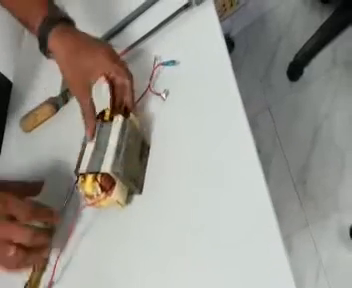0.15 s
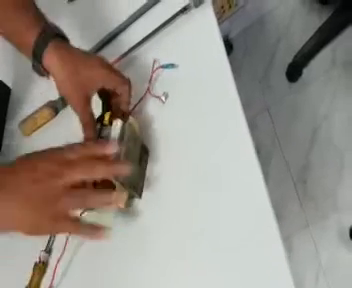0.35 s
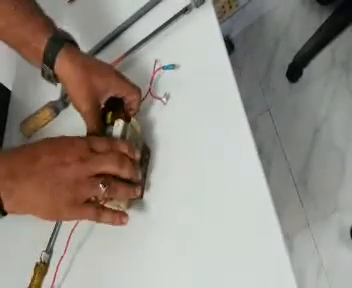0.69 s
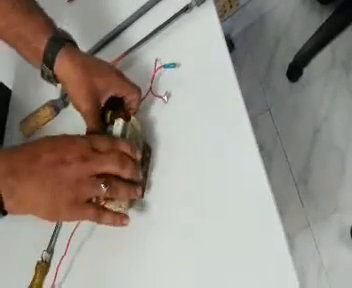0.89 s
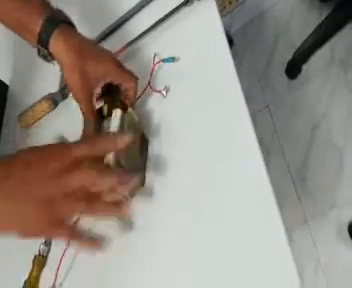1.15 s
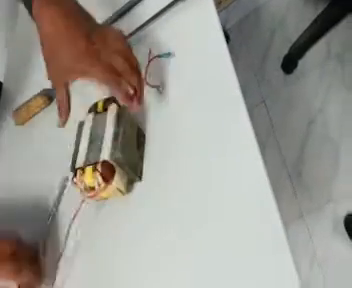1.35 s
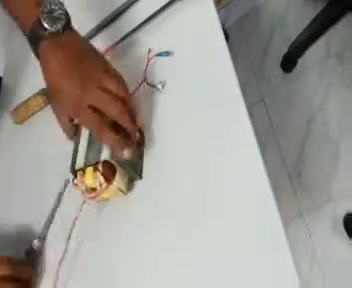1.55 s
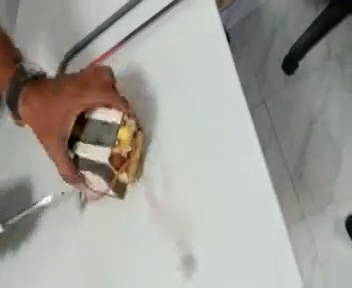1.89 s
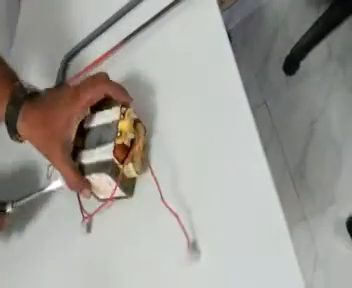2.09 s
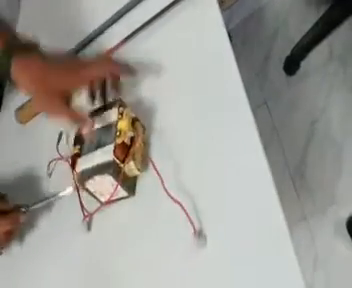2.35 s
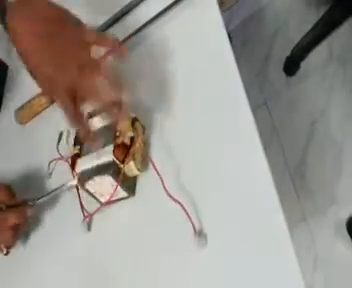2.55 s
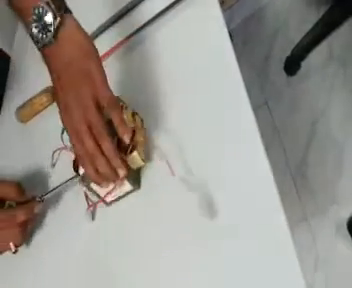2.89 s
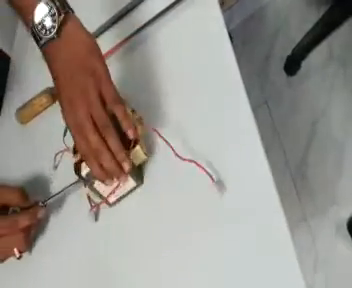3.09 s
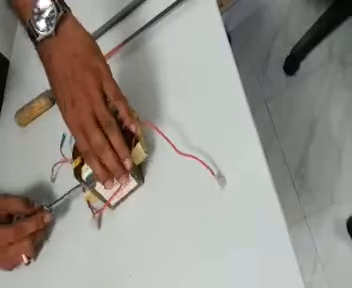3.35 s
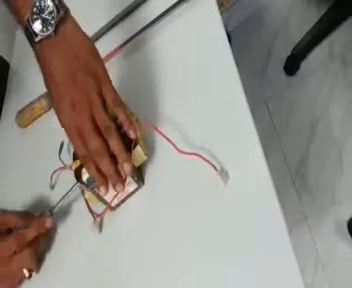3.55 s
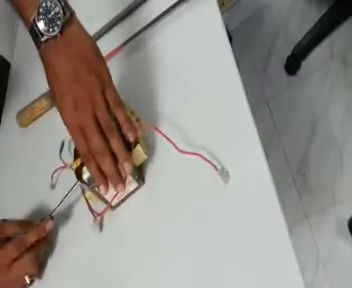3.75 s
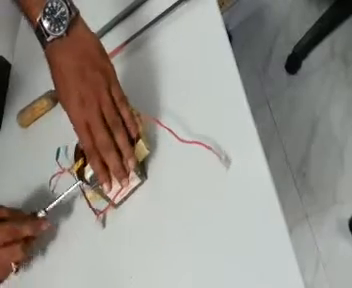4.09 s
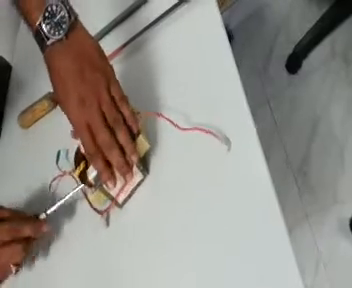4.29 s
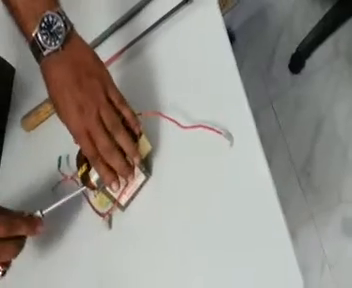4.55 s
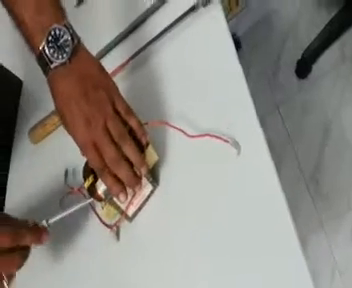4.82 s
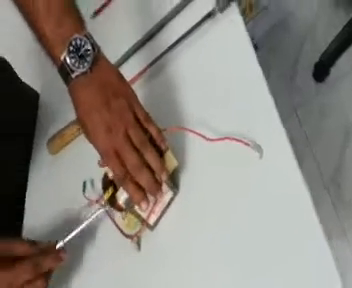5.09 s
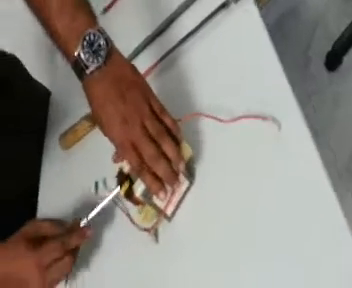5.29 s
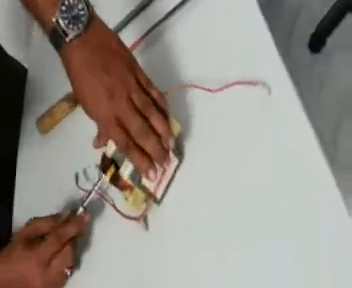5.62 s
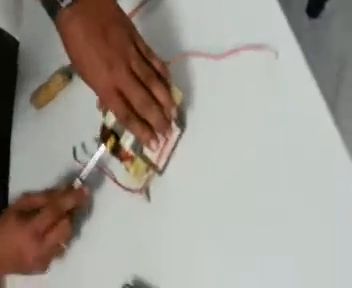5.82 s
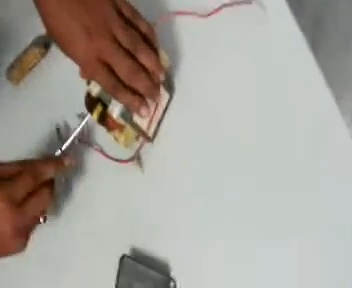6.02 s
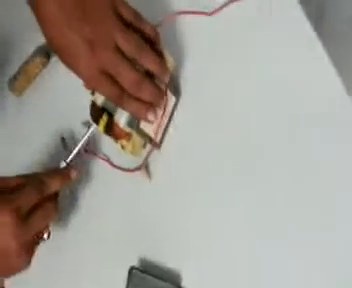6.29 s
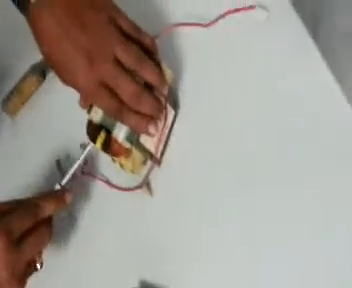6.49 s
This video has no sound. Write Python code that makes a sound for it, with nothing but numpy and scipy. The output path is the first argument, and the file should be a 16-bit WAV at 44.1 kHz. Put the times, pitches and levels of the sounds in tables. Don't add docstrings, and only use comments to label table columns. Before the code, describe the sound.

A small iron core with a winding is dragged and knocked down on a resonant table in a hard room, with steel clicks and short scrapes, mostly in the first two seconds. A quieter stretch of faint prying ticks follows, then loud crackling finger rubs on the left microphone port near five seconds, and hard metallic snaps at the end. Close, muffled above, clipping at peaks.

```python
import sys
import numpy as np
from scipy import signal
from scipy.fft import rfft, irfft, next_fast_len
from scipy.io import wavfile
from scipy.ndimage import uniform_filter1d, map_coordinates

SR = 44100
rng = np.random.default_rng(int(sys.argv[2]) if len(sys.argv) > 2 else 0)


def waveform_to_disk(signal):
    frames = np.transpose(np.atleast_2d(signal))
    scaled = np.clip(frames, -1, 1) * 32767
    samples = np.round(scaled).astype(np.int16)
    wavfile.write(sys.argv[1], SR, samples)


def nominal_scale(level):
    x = np.asarray(level, float) / 20
    return 10 ** x


N = 293265

JOLT_DB_PER_S = 6000

# start_s, end_s, level_db, brightness_db, heaviness_db
SLIDES = [(0, 0.051, -22.5, -9, -26), (0.283, .33, -25.5, -8.5, -7.5), (1.029, 1.079, -37.5, -2, -10),
          (1.264, 1.362, -51, -17, 2), (1.424, 1.484, -28.5, 1.5, -9.5), (1.477, 1.54, -24, -8, -15),
          (1.547, 1.588, -20.5, -2.5, -29), (1.616, 1.728, -31.5, -2.5, -8), (1.791, 1.964, -41, 1.5, -8.5),
          (2.694, 2.81, -45.5, 10, -4.5), (3.187, 3.245, -51.5, 10, -1), (3.278, 3.343, -43.5, 1.5, -11.5),
          (3.86, 3.888, -48, 7, -14), (4.055, 4.15, -46, 6.3, 0.1), (4.996, 5.047, -38.5, 6, -26),
          (5.32, 5.331, -32.5, 0.5, -3.5), (5.483, 5.477, -43, -5, -3.5), (5.555, 5.653, -39, -7.5, -5.5),
          (5.685, 5.789, -38.5, 3.5, -8), (5.91, 6.092, -49.5, 1.8, -15), (6.258, 6.307, -63, -5, -31),
          (6.393, 6.381, -34, -3, -19), (6.496, 6.485, -34.5, 3, -27), (6.55, 6.652, -51, 8, -26)]
# centre_hz, width_hz, level_db
BOARD = [(343, 26, -6), (399, 18, -4.5), (496, 22, -7.5), (565, 25, 0.5), (704, 70, -6.5), (797, 13, 2),
         (929, 40, -5), (1064, 13, -1.5), (1250, 45, -6), (1650, 50, -6)]
PUSH_DB_PER_S, STOP_DB_PER_S = 165.5, 218.5
LINGER_DB, LINGER_DB_PER_S = -8, 56
KNOCK_BRIGHT_DB = -12


def drag():
    shudders = [(s, s + length_s, db, KNOCK_BRIGHT_DB, heavy_db)
                for s, _, db, length_s, heavy_db in KNOCKS]
    start, end, db, bright_db, heavy_db = np.transpose(SLIDES + shudders)
    swell = np.repeat([PUSH_DB_PER_S, JOLT_DB_PER_S], [len(SLIDES), len(KNOCKS)])
    direct_db = held(start, end, db, swell, STOP_DB_PER_S)
    linger_db = held(start, end, db + LINGER_DB, swell, LINGER_DB_PER_S)
    level_db = np.maximum(direct_db, linger_db) + 0.34
    gain = summed(level_db, nominal_scale([0 * db, bright_db - 1.5, heavy_db - 0.5]))

    board = modes(BOARD)
    hump = lambda hz, centre_hz, steep_db: nominal_scale(-steep_db * np.log2(hz / centre_hz + 1e-3) ** 2)
    body = paired(grains(2.1, rate=60), lambda hz: hump(hz, 681, 9.7) * (0.41 + abs(board(hz))))
    upper = paired(grains(1.7, rate=90), lambda hz: hump(hz, 1334, 6.9))
    lower = paired(grains(1.7, rate=32), lambda hz: hump(hz, 333, 15))
    return gain[0] * body + gain[1] * upper + gain[2] * lower


# start_s, peak_db, shudder_db, shudder_s, heaviness_db
KNOCKS = [(0.091, -23, -21.5, 0.032, -18.5), (0.338, -2.5, -11, .014, -11.5),
          (0.69, -16.5, -34, 0.073, -18), (0.789, -18, -20.5, 0.07, -12.5), (1.989, -24, -28, .02, -9.5),
          (2.003, -21, -31.5, 0.094, -1), (2.138, -9, -18.5, 0.014, -7.5), (2.149, -4.5, -19.5, 0.024, -2),
          (3.889, -23, -34.5, 0.043, 1.5), (4.15, -30, -28, 0.033, 0), (4.7, -28.5, -49, 0.055, 3.5),
          (5.501, -19, -32.5, 0.022, 0.5)]
KNOCK_T60_S = 0.17


def knocks():
    out, t = np.zeros((2, N + SR)), np.arange(SR // 4) / SR
    board, floor = modes(BOARD), modes([(600, 800, 0)])

    def table_top(hz):
        lowpass = (1 + 1j * hz / 1500) ** 2
        highpass = (1 - 1j * 220 / (hz + 1)) ** 2
        return (board(hz) + 0.22 * floor(hz)) / lowpass / highpass

    for s, db, *_ in KNOCKS:
        shake = nominal_scale(-60 * t / KNOCK_T60_S) * rng.standard_normal((2, len(t)))
        shake[0, :30] += 7 * np.hanning(30) * np.linspace(1, -1, 30)
        mid, side = filtered(shake, table_top)
        ring = np.array([mid + 0.65 * side, mid - 0.34 * side])
        out[:, round(s * SR):][:, :len(t)] += nominal_scale(db - 2.5) * ring / abs(mid).max()
    return out[:, :N]


# start_s, peak_db, centre_hz, left_minus_right_db
CORE = [(.0927, -14, 2190, 2), (.3306, -14, 2000, 14.5), (.3425, -8, 1287, 2), (.7831, -19, 1510, 5),
        (.9807, -27.5, 3440, 16), (1.2625, -33, 1490, 1), (1.3714, -9.5, 2130, 9), (1.5614, -13, 1980, 5),
        (2.138, -15.5, 3480, -5), (3.8551, -34, 1600, -4)]
# start_s, peak_db, centre_hz, left_minus_right_db
TICKS = [(.3681, -8, 3180, 4.3), (1.3668, -3.5, 3220, 11.5), (2.6758, -33, 1950, 5),
         (2.7043, -27.5, 1650, -0.5), (2.9677, -22.5, 3060, 0.5), (3.2799, -13.5, 3750, 10.5),
         (3.2844, -17, 4130, 13.5), (3.2909, -8.5, 3900, 6), (3.2964, -11.5, 2400, -0.5),
         (4.2527, -23, 4070, 7.5), (4.2737, -15, 3840, 16.5), (4.4263, -29.5, 3550, 8),
         (4.577, -28, 4500, 6.5), (4.6144, -26, 3030, 25), (4.6478, -31, 2860, 3.5),
         (4.7755, -27, 3600, 11), (6.0332, -15.5, 3980, 13.5), (6.4862, -8.5, 3850, 4.2)]
# start_s, peak_db, centre_hz, left_minus_right_db
SNAPS = [(.6835, -16, 3350, 4), (1.5529, -9.5, 3250, 3), (6.3545, -2, 4300, 11), (6.3595, -10, 2000, 3),
         (5.049, -13, 3200, 17.5), (5.2426, -24, 2500, -2), (5.295, -15.5, 3430, -1), (5.3085, -3, 2980, 0),
         (5.3689, -20.5, 2940, 5.5), (5.4825, -17.5, 1555, 2), (5.502, -21, 2250, -10.5),
         (5.5209, -22.5, 2300, -12), (5.6858, -29, 2490, -9), (5.697, -21.5, 2530, 4)]
# start_s, peak_db, centre_hz, left_minus_right_db
SPRINGS = [(6.153, -2, 3394, 9)]
# kind, body_db, breadth_db, shaft_ring_db
CONTACTS = [(CORE, 2.3, -17, -29), (TICKS, -21.5, -8, -38), (SNAPS, -7.5, -2.5, -30),
            (SPRINGS, -34, -3, -11.5)]
# centre_hz, width_hz, level_db
SHAFT = [(1693, 45, -0.5), (2240, 89, 0), (3900, 58, -3)]


def clicks():
    out, t = np.zeros((2, N + SR)), np.arange(2048) / SR
    contacts = [(*row, *colour) for kind, *colour in CONTACTS for row in kind]
    for s, db, hz, pan_db, body_db, broad_db, ring_db in contacts:
        envelope = nominal_scale(-60 * t / 0.0082) * (1 - np.exp(-t / 0.00046))
        crack = envelope * rng.standard_normal((2, len(t)))
        crack[1] = 0.41 * crack[0] + 1.2 * crack[1]
        bands = [(hz, 450, 0), (4700, 1500, broad_db - 3.0), (1800, 600, broad_db - 8.5)]
        steel = filtered(crack, modes(bands))
        steel = steel / abs(steel).max(1, keepdims=True) * nominal_scale(-3.5) * sides(pan_db)[:, None]
        body = filtered(crack[0], modes([(1075, 300, 0)]))
        ring = filtered(crack, modes(SHAFT))
        hit = nominal_scale(db + 1.23) * (steel + nominal_scale(body_db) * body / abs(body).max())
        hit = hit + nominal_scale(db + ring_db) * ring / abs(ring).max()
        tail = nominal_scale(-7) * room(hit)
        out[:, round(s * SR):][:, :len(t)] += hit
        out[:, round(s * SR):][:, :tail.shape[1]] += tail
    return out[:, :N]


# freq_hz, t60_s
ROOM = [(200, 0.65), (700, 0.31), (2000, 0.24), (5000, 0.24)]


def room(x):
    hz, t, z = signal.stft(rng.standard_normal((2, SR // 4)), SR, nperseg=256)
    decay = nominal_scale(-60 * t / along(ROOM, hz)[:, None])
    tail = signal.istft(z * decay, SR, nperseg=256)[1]
    return signal.fftconvolve(x, tail / np.linalg.norm(tail[0]), axes=1)


# start_s, end_s, level_db, left_minus_right_db
GRINDS = [(0, 0.005, -46, 7), (0.162, 0.264, -49, 6), (0.331, 0.327, -34.5, 8), (0.988, 0.994, -42, 13.5),
          (1.036, 1.067, -39.5, 19), (1.298, 1.365, -49, 3), (1.503, 1.545, -32, 16.5),
          (1.603, 1.7, -36.5, 17.5), (1.734, 1.83, -35, 9.5), (2.657, 2.716, -42.5, 6),
          (2.74, 2.812, -45.5, 12), (3.176, 3.263, -57.5, 3.5), (3.846, 3.904, -50, 6),
          (4.133, 4.255, -53, 7), (4.265, 4.32, -46.5, 11), (4.43, 4.455, -49, 0), (4.593, 4.651, -48.5, 7),
          (4.78, 4.766, -41, 9), (5.9, 5.911, -42.5, 16), (5.993, 6.007, -35, 15), (6.2, 6.218, -46, 4),
          (6.309, 6.33, -51.5, 8), (6.406, 6.474, -45.5, 6), (6.526, 6.651, -45, 5.5)]
# start_s, level_db, left_minus_right_db
SKIDS = [(0.094, -30, 7.5), (0.373, -37, -8), (0.684, -32.5, 2.5), (1.38, -36.5, 1), (1.558, -20, 8),
         (2.141, -40, 9), (2.97, -45.5, 3), (3.299, -29.5, 4), (4.279, -49.5, 3), (6.144, -32.5, 7.5),
         (6.162, -38, 16), (6.368, -38, 2.5), (6.487, -32, 14)]
# freq_hz, level_db_per_hz
GRIT = [(530, -20.5), (900, -4.5), (1050, -4), (1180, -7.5), (1690, -6), (2140, -4), (3590, -3),
        (4860, -12), (5270, -29), (6850, -56.5), (11600, -120)]
GRIND_SWELL_DB_PER_S, GRIND_FADE_DB_PER_S, SKID_FADE_DB_PER_S = 210, 227, 322


def scrape():
    start, end, db, pan_db = np.transpose(GRINDS)
    grind_db = held(start, end, db, GRIND_SWELL_DB_PER_S, GRIND_FADE_DB_PER_S)
    grinds = summed(grind_db, sides(pan_db))
    s, db, pan_db = np.transpose(SKIDS)
    skids = summed(held(s, s, db, JOLT_DB_PER_S, SKID_FADE_DB_PER_S), sides(pan_db))
    grit = paired(grains(2.3, rate=160), lambda hz: tone(GRIT, 3800, 9)(hz) * (hz > 1700))
    return np.hypot(grinds, skids) * grit


# start_s, end_s, level_db
STROKES = [(5.099, 5.097, -24.5), (5.135, 5.165, -26.5), (5.216, 5.258, -27), (5.287, 5.286, -18),
           (5.315, 5.337, -2.5), (5.358, 5.379, -9.5), (5.377, 5.406, -8), (5.423, 5.439, -24.5),
           (5.586, 5.596, -34.5), (5.706, 5.732, -7), (5.727, 5.752, -5.5), (5.769, 5.768, -9),
           (5.823, 5.851, -42.5)]
# start_s, end_s, level_db
FLICKS = [
    (4.915, 4.939, -29),
    (4.954, 4.967, -21.5),
    (4.983, 5.001, -12),
    (5.023, 5.044, -10.5),
    (5.799, 5.798, -13),
]
# start_s, end_s, level_db
ASIDE = [(4.943, 4.96, -48), (5.011, 5.08, -37.5), (5.145, 5.161, -42), (5.27, 5.342, -38.5),
         (5.398, 5.46, -42.5), (5.522, 5.524, -26), (5.544, 5.585, -31), (5.7, 5.748, -32.5),
         (5.803, 5.837, -49.5)]
# freq_hz, level_db_per_hz
SKIN = [(350, -60), (600, -25.5), (1040, -28.5), (1260, -11), (1440, -7.5), (1600, -7), (1970, -5.5),
        (2970, 0.5), (3560, 0), (5270, -9), (6850, -38.5), (11600, -120)]
LAND_DB_PER_S, LIFT_DB_PER_S, CATCH_DB_PER_S = 625.5, 750.5, 2504
FIRMER = 8.6
CRACKLE_PER_S, CRACKLE_DB = 1300, 3


def rub():
    start, end, db = np.transpose(STROKES + FLICKS)
    is_stroke = np.arange(len(db)) < len(STROKES)
    land = np.where(is_stroke, LAND_DB_PER_S + FIRMER * db, CATCH_DB_PER_S)
    lift = LIFT_DB_PER_S + FIRMER * db
    pressure = summed(held(start, end, db, land, lift), [np.ones(len(db))])[0]

    chance, size = rng.random(N), rng.exponential(size=N)
    pops = (chance < CRACKLE_PER_S / SR) * nominal_scale(CRACKLE_DB * size)
    crackle = unit(pops * np.sign(size - np.log(2)))
    hiss = nominal_scale(1.5 * wobble(90)) * grains(1.2, rate=300)[0]
    left = pressure * unit(filtered(hiss + nominal_scale(-6.5) * crackle, tone(SKIN, 3400, 6)))

    grit = tone(GRIT, 3800, 14)
    tilt = lambda hz: nominal_scale(-2.5 * np.log2(hz / 2000 + .1)) * (hz > 900)
    far = unit(filtered(grains(3.7, rate=120), lambda hz: grit(hz) * tilt(hz)))
    aside_db = held(*np.transpose(ASIDE), GRIND_SWELL_DB_PER_S, GRIND_FADE_DB_PER_S)
    aside = summed(aside_db, [np.ones(len(ASIDE))])
    return np.array([left, np.zeros(N)]) + aside * far * nominal_scale([[-9], [.1]])


# freq_hz, level_db_per_hz
AIR = [(35, -49), (60, -23.5), (259, -11), (295, -7), (376, -4.5), (453, -8), (547, -5), (1680, -10),
       (2230, -18), (4290, -8), (5270, -53), (6850, -61.5), (11600, -120)]
AIR_DB = -48.5


def room_air():
    level = nominal_scale(AIR_DB + 1.82 + 0.4 * wobble(3))
    return level * paired(rng.standard_normal((2, N)), tone(AIR, 3986, 19))


def unit(x):
    return x / np.sqrt(np.mean(x ** 2) + 1e-20)


def along(points, hz):
    f, v = np.transpose(points)
    return np.interp(np.log(hz + 1), np.log(f + 1), v)


def wobble(rate):
    knots = rng.standard_normal(int(N * rate / SR) + 4)
    return map_coordinates(knots, [np.arange(N) * rate / SR])


def filtered(x, response):
    m = next_fast_len(x.shape[-1] + 8192)
    return irfft(rfft(x, m) * response(np.fft.rfftfreq(m, 1 / SR)), m)[..., :x.shape[-1]]


def modes(table):
    def response(f):
        total = 0
        for k, (centre, width, db) in enumerate(table):
            damping = 1j * f * width
            total = total + (-1) ** k * nominal_scale(db) * damping / (centre * centre - f * f + damping)
        return total
    return response


def tone(points, knee_hz, slope_db):
    def gain(hz):
        rolloff_db = slope_db * np.maximum(hz - knee_hz, 0) / 1000
        return nominal_scale(along(points, np.minimum(hz, knee_hz)) - rolloff_db)
    return gain


def grains(spread_db, rate):
    return nominal_scale(spread_db * wobble(rate)) * rng.standard_normal((2, N))


# freq_hz, likeness_0_to_1
ALIKE = [(60, 0.82), (140, 0.96), (350, 0.84), (830, 0.43), (2000, 0.07), (4820, 0.076)]


def paired(pair, gain):
    turn = lambda hz: np.arccos(np.clip(along(ALIKE, hz), 0, 1)) / 2
    mid, side = filtered(pair, lambda hz: gain(hz) * [np.cos(turn(hz)), np.sin(turn(hz))])
    return unit(np.array([mid + side, mid - side]))


def sides(pan_db):
    right = nominal_scale(-pan_db)
    return 2 * np.array([np.ones_like(right), right]) / np.sqrt(1 + right ** 2)


def held(start, end, db, swell, fade):
    t = np.arange(0, N / SR + .01, .001)[:, None]
    return db - np.maximum(np.maximum(swell * (start - t), fade * (t - end)), 0)


def summed(level_db, gains):
    total = np.sqrt(nominal_scale(2 * level_db) @ np.transpose(gains) ** 2)
    t = np.arange(N) / SR
    return np.array([np.interp(t, np.arange(len(c)) / 1000, c) for c in total.T])


def scene():
    return drag() + knocks() + clicks() + scrape() + rub() + room_air()


# freq_hz, level_db
MASK = [(60, -23.5), (150, -27.5), (300, -24), (1000, -24.5), (2200, -27), (3500, -35.5), (4300, -23),
        (4800, -22), (5400, -22)]


def starved(x, ragged_db, treble_db):
    hz, _, z = signal.stft(x, SR, window="cosine", nperseg=2048)
    size, used = 7, 260
    hz, power = hz[:used], abs(z[:, :used])
    weight = nominal_scale(treble_db * np.clip(hz / 2500, 0, 1))[:, None]
    loud = np.sqrt(np.sum((power * weight) ** 2, axis=1, keepdims=True))
    ragged = rng.standard_normal((2, used // size + 1, z.shape[2]))
    ragged = np.repeat(ragged, size, axis=1)[:, :used]
    ragged = unit(uniform_filter1d(ragged, size=3, axis=2))
    budget = rng.standard_normal((2, 1, z.shape[2]))
    near = uniform_filter1d(power, 3, axis=1)
    threshold_db = along(MASK, hz)[:, None] - 12.5 + ragged_db * ragged + 2.5 * budget
    z[:, :used] *= near > loud * nominal_scale(threshold_db)
    return signal.istft(z, SR, window="cosine", nperseg=2048)[1][:, :N]


def roll_off(x):
    return signal.sosfilt(signal.butter(12, 5420, fs=SR, output="sos"), x)


def record(dry):
    x = filtered(dry, lambda hz: hz < 5450)
    x = starved(x, ragged_db=4.5, treble_db=6.5)
    x = filtered(np.clip(x, -1, 1), lambda hz: hz < 15800)
    x = np.clip(x, -1, 1)
    return roll_off(x)


dry = scene()
out = record(dry)
waveform_to_disk(out)
```